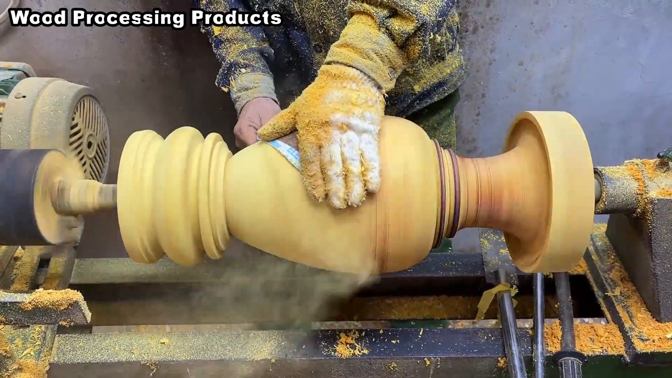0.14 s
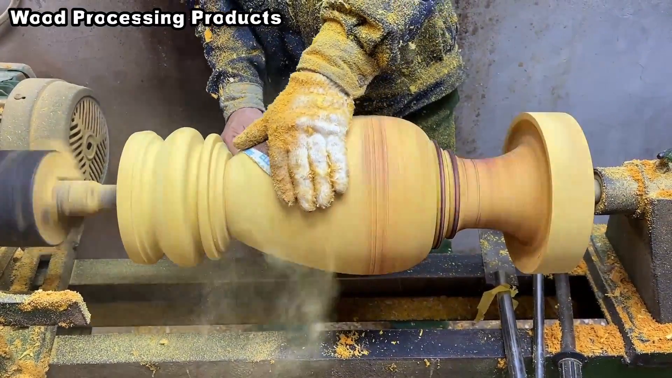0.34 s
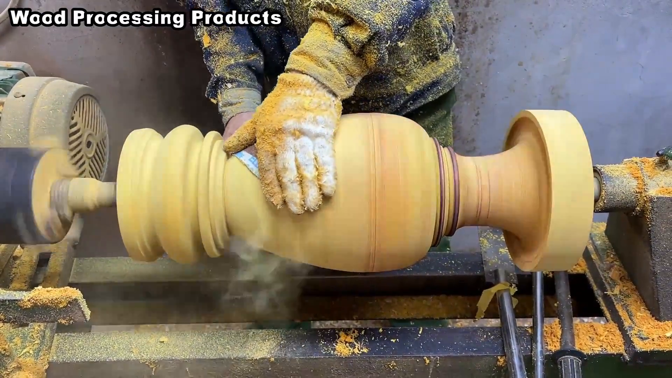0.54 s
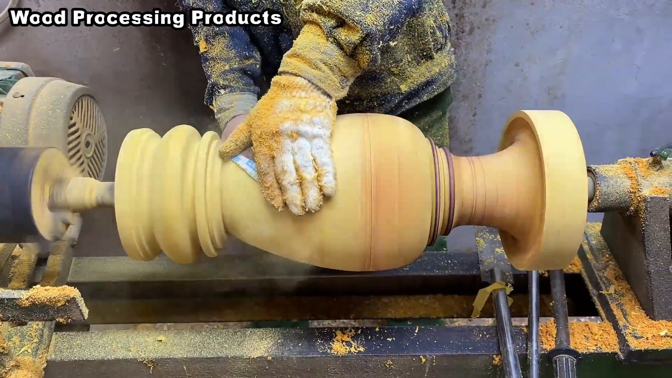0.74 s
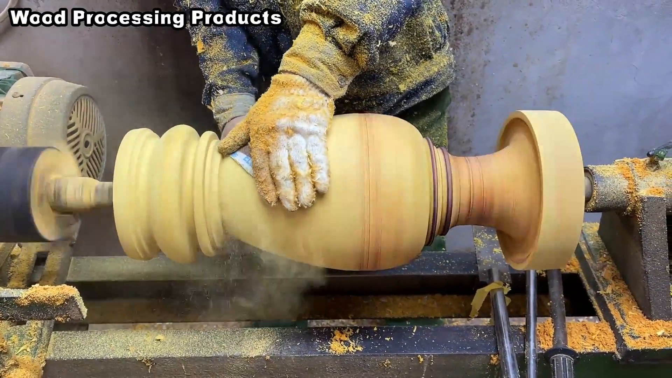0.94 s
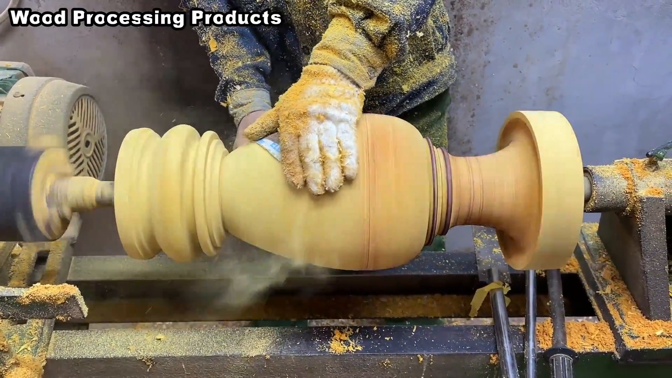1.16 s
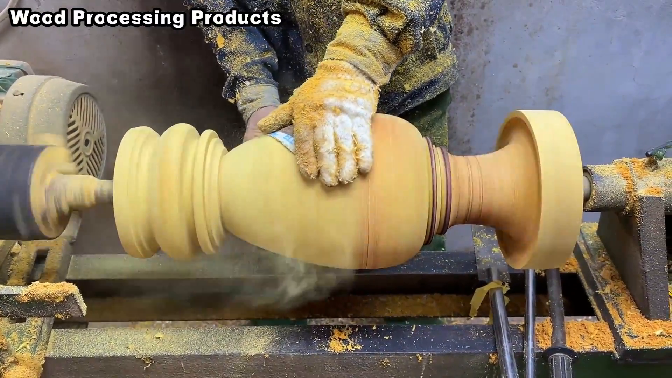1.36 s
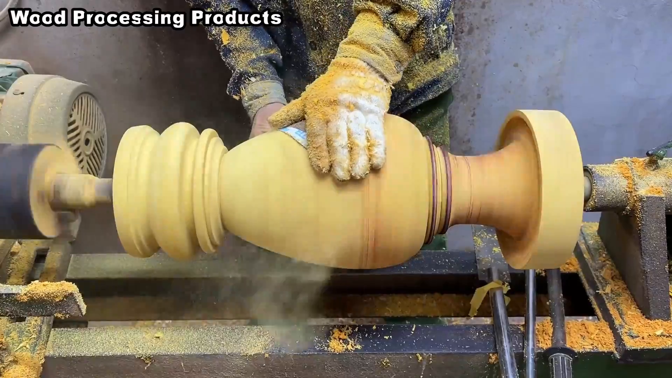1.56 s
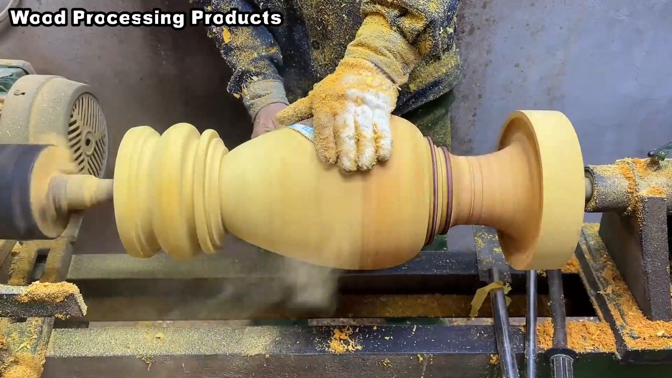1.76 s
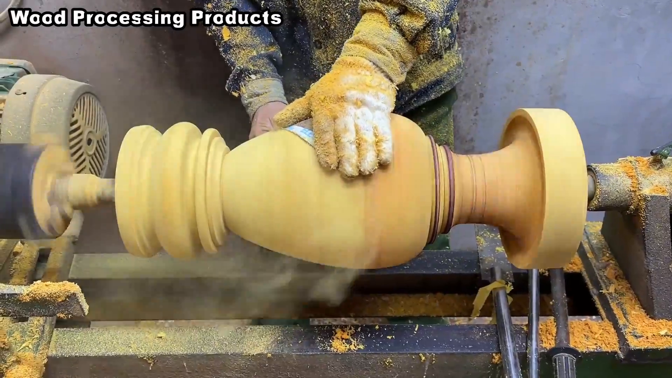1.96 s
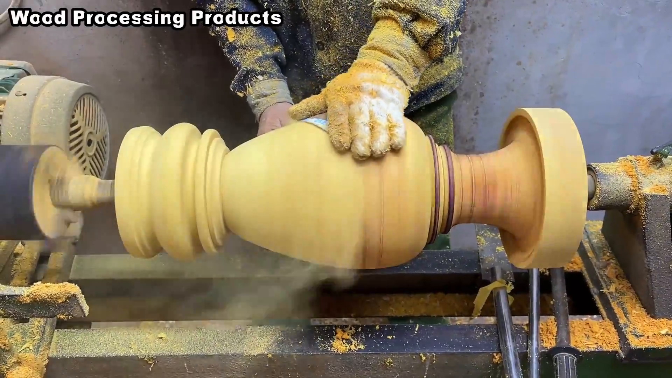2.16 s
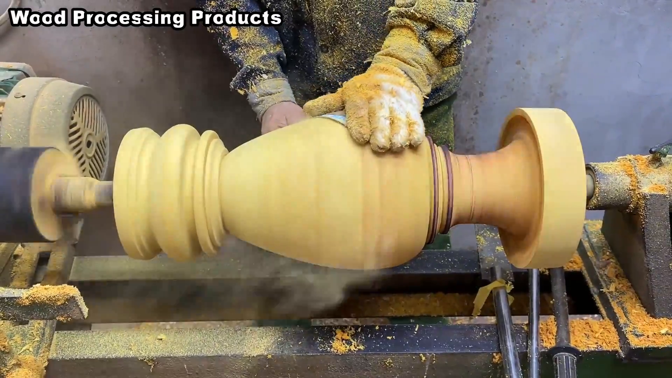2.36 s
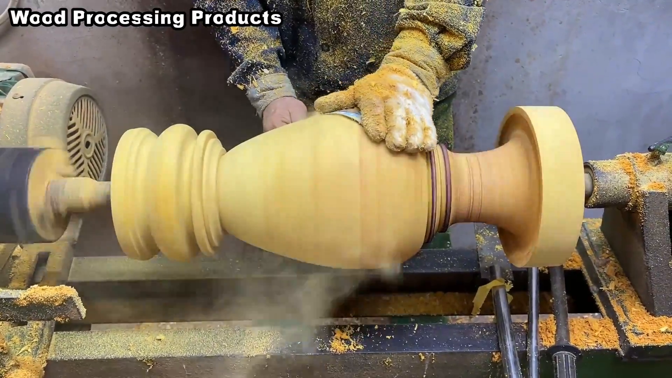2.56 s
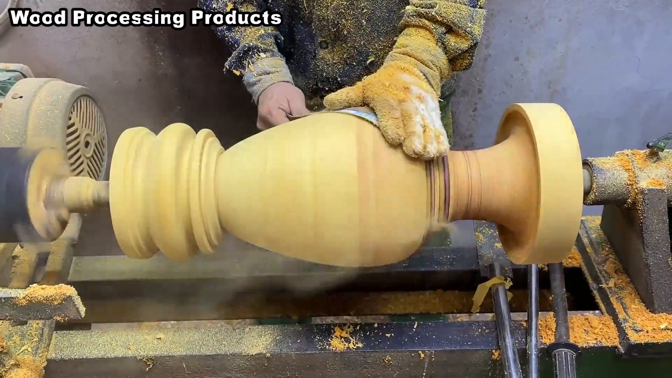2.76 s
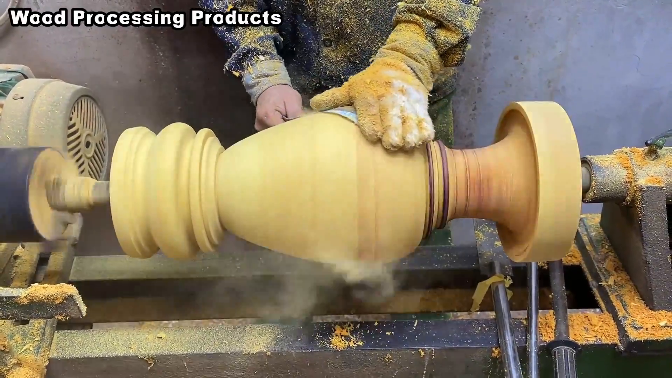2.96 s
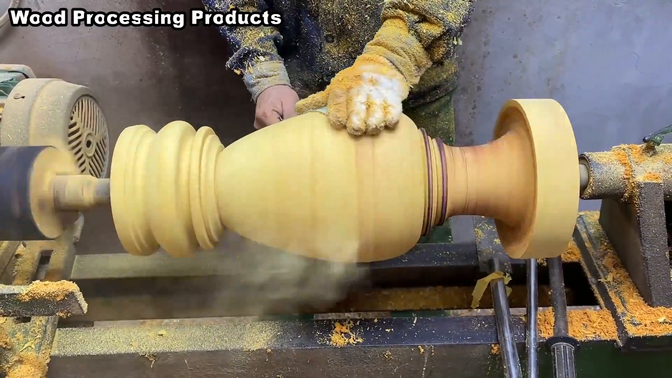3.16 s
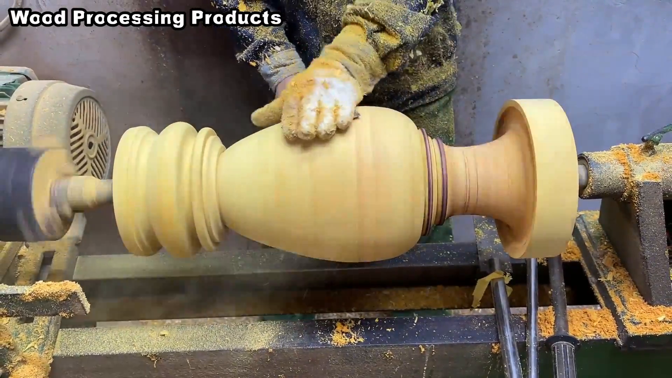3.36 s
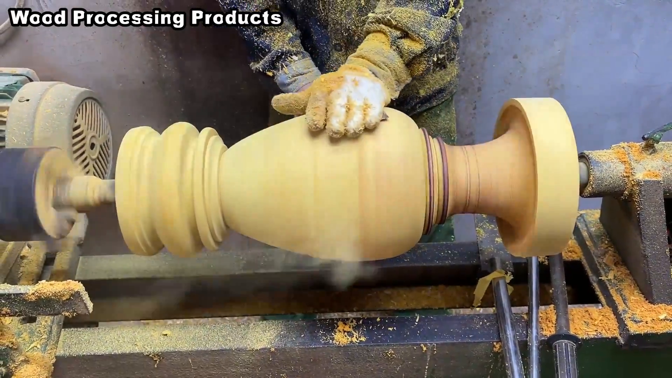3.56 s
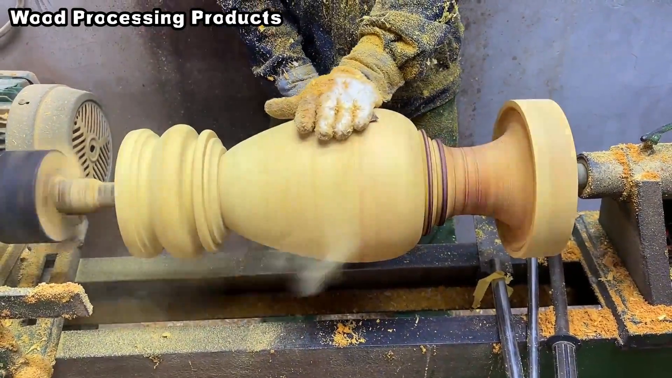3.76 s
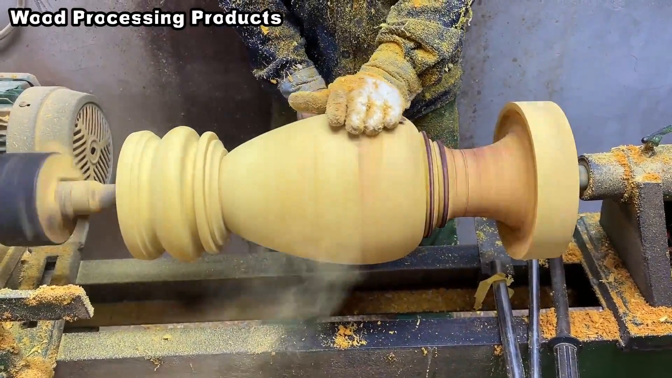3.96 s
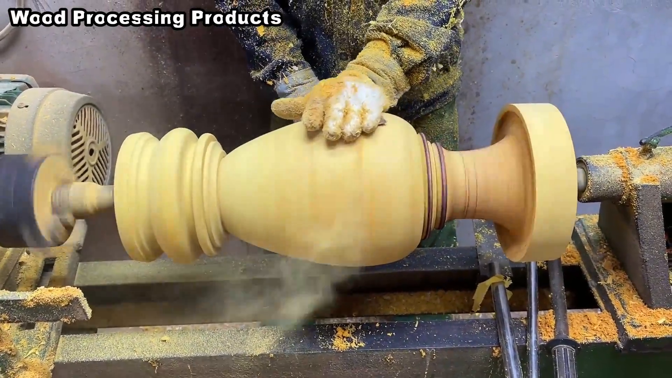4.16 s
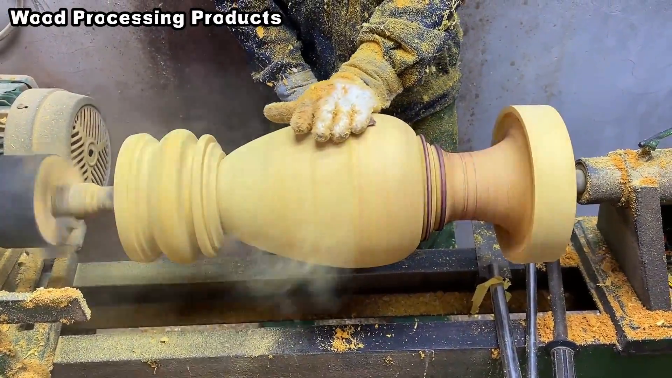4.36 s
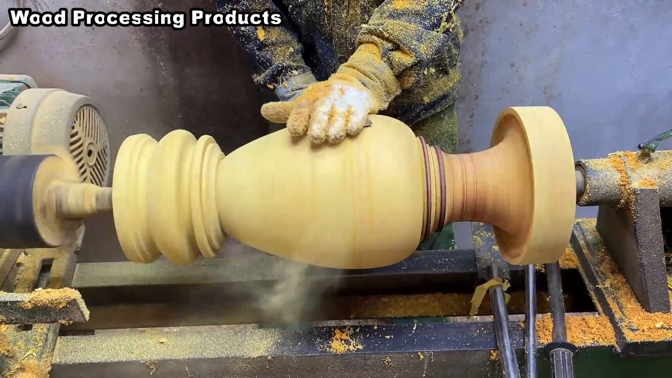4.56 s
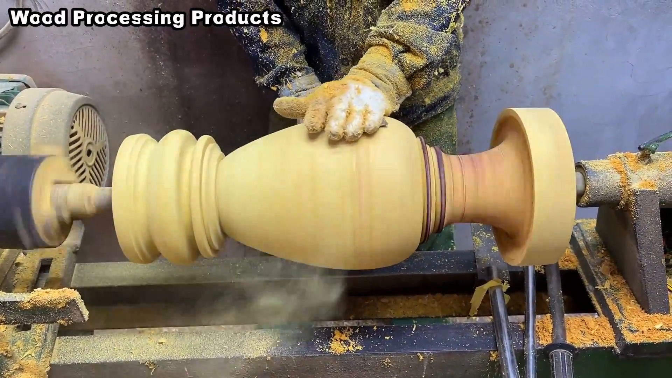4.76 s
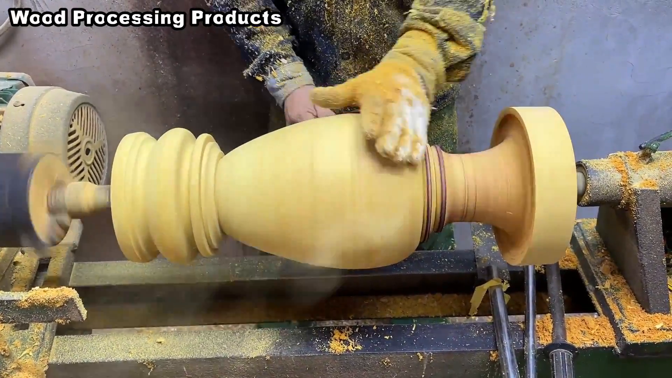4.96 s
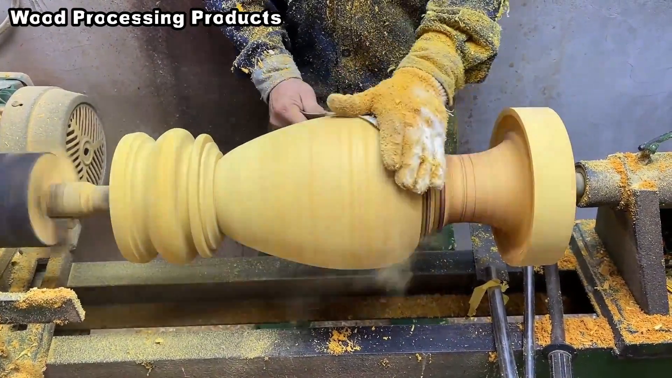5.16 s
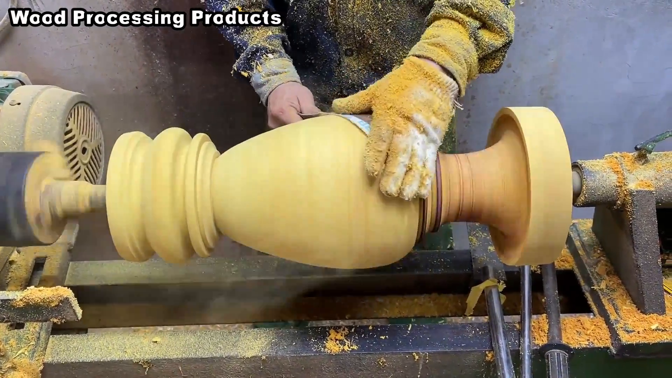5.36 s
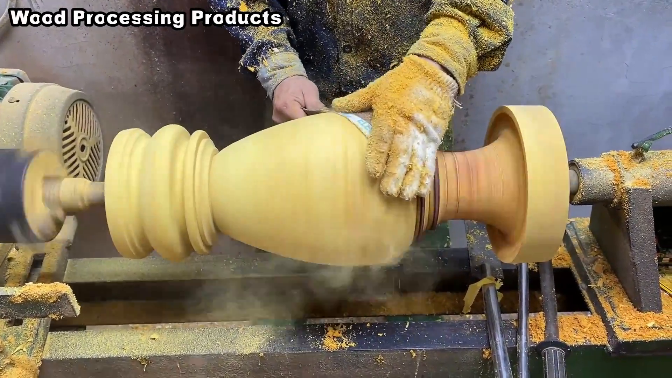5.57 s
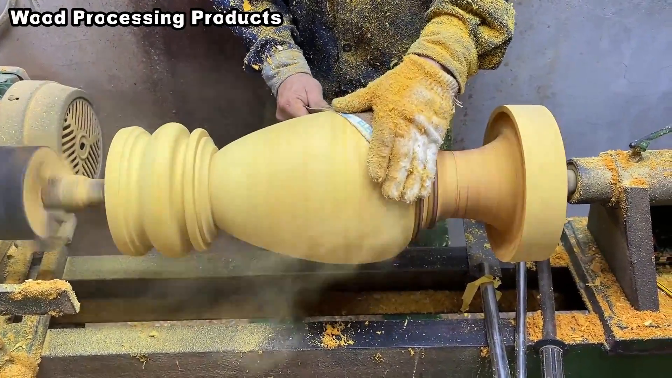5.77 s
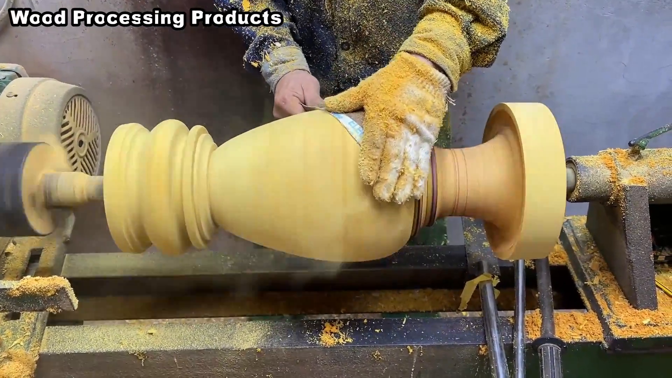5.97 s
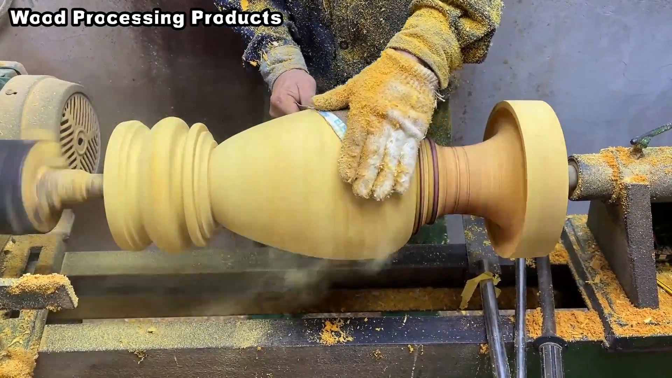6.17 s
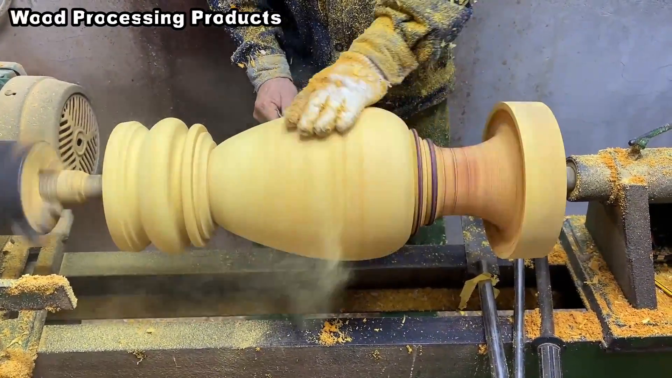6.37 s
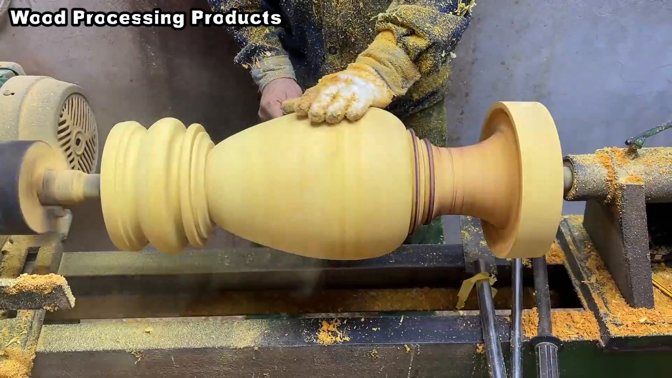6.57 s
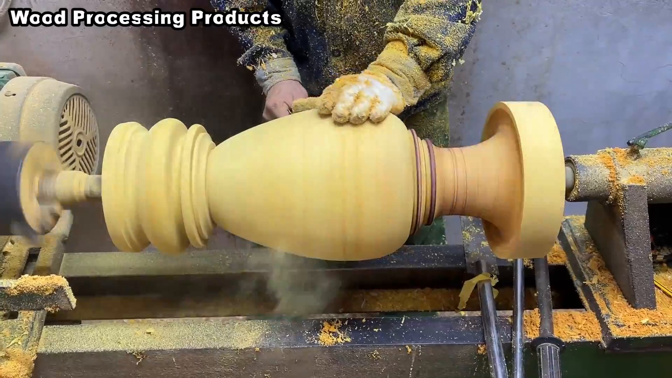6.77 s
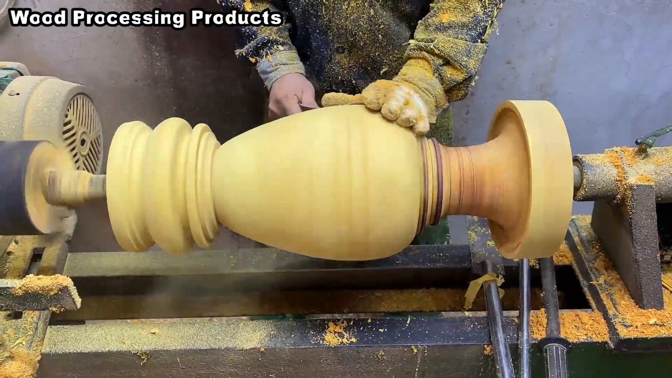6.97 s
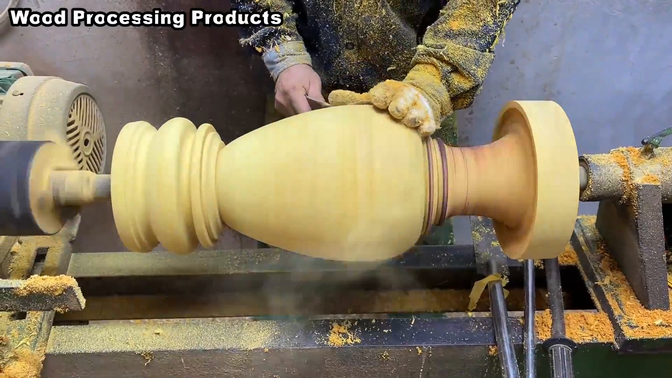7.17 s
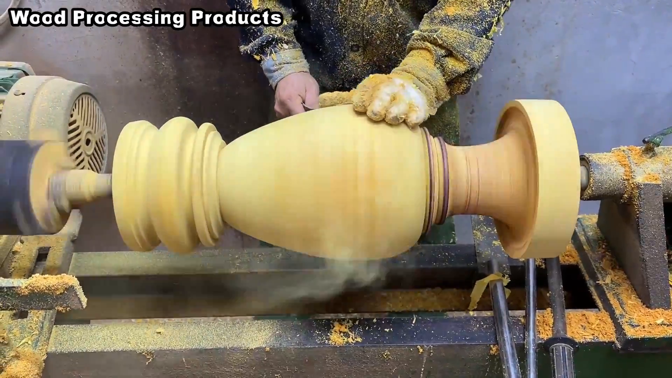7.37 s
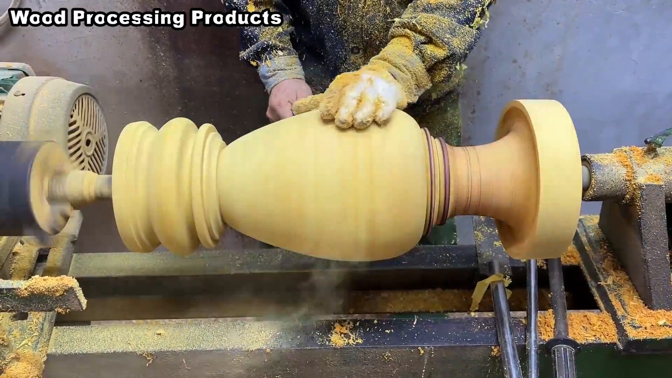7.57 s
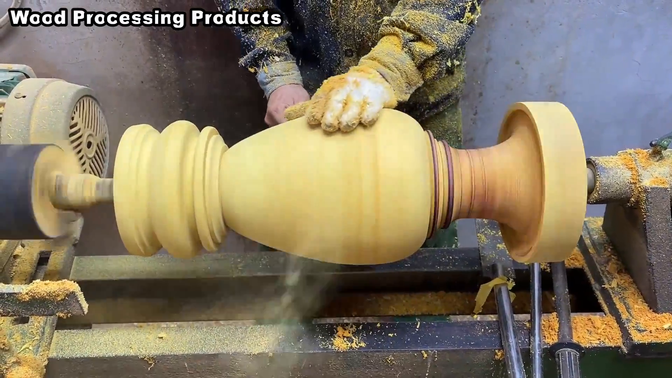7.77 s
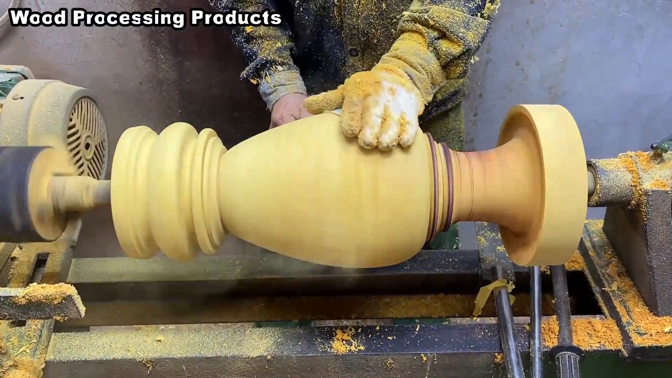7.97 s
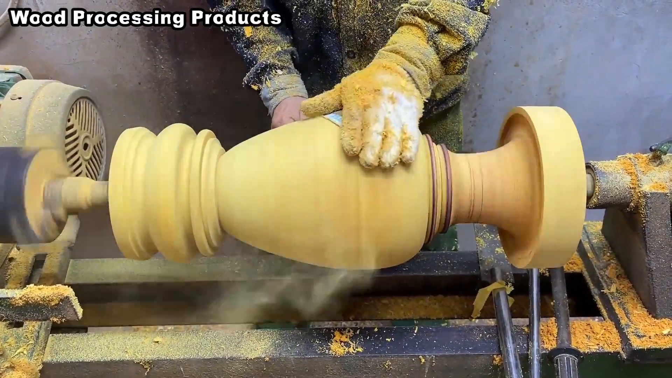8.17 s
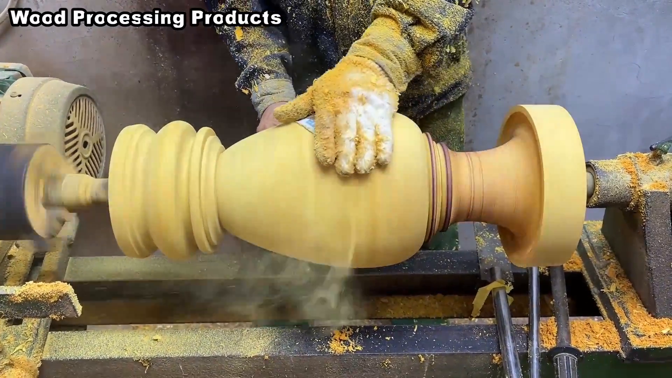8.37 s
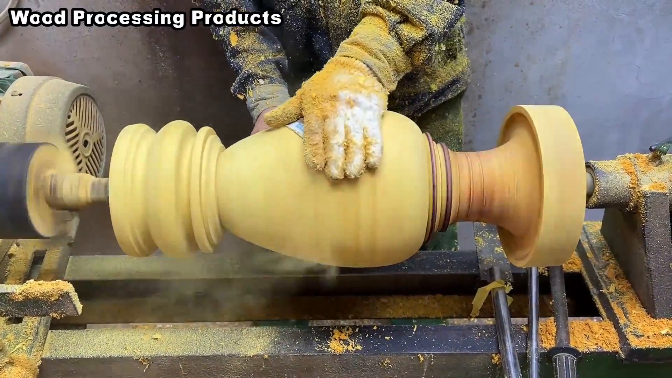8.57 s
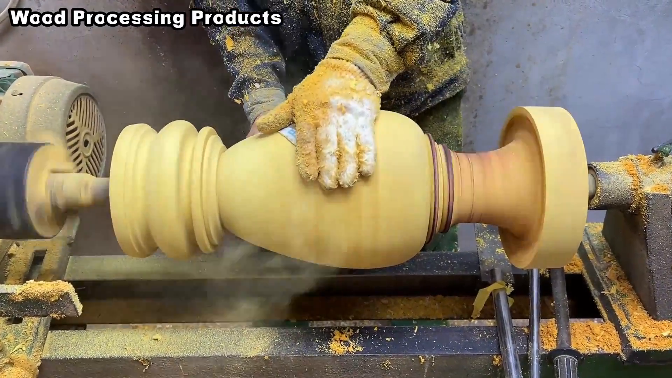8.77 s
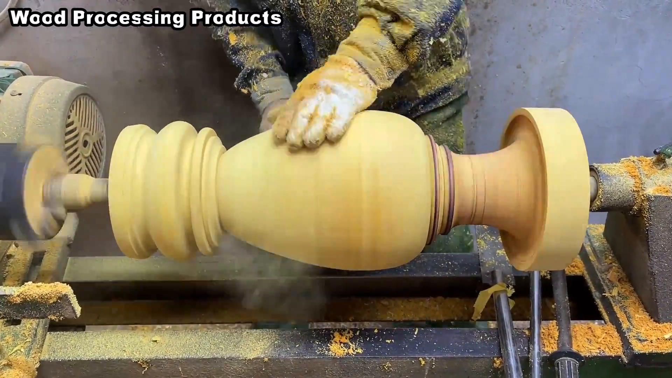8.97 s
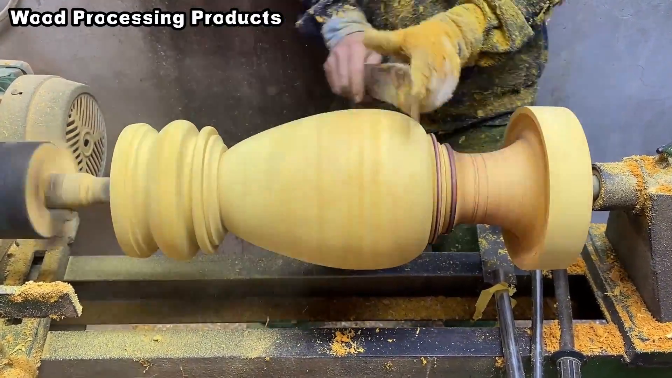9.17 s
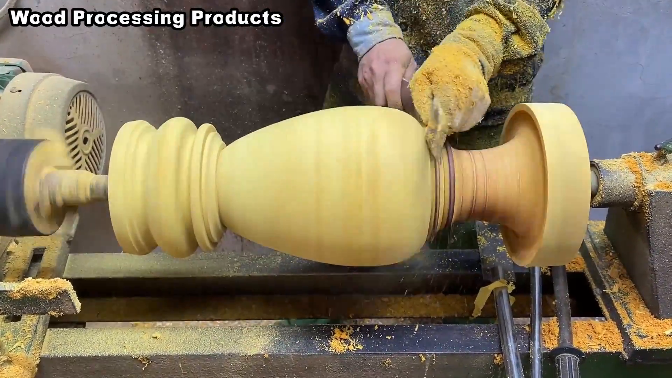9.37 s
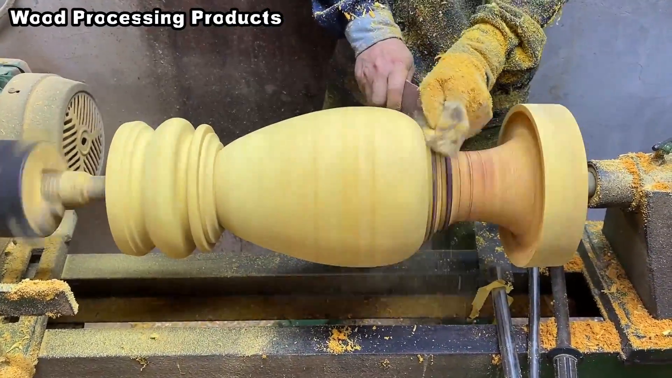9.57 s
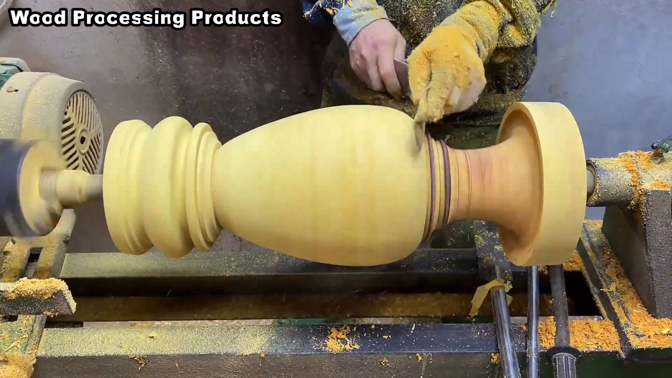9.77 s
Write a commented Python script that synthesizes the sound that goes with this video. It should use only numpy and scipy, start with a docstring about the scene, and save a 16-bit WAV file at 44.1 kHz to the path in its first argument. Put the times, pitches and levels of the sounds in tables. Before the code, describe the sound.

Close stereo sound of wood being sanded on a running lathe. A fine, gritty hiss dominates, wavering in strength and shifting between raspy and airy, weaker through the middle. A muffled mid-low motor drone flutters beneath, with a faint low hum. Irregular low wind thumps touch the microphones. The paper lifts for an instant early on, then for longer near the end, exposing the motor before a light tick and renewed sanding.

```python
"""In a workshop, a gloved hand holds sandpaper on a wooden vase spinning in a lathe.
The hiss is dense grit noise, recoloured as hand and paper travel; it stops when the paper is lifted.
The drive rumbles and throbs as noise rung through housing modes, over a broad wash and a blade tone.
The draught of the spinning work buffets the microphones: lumpy low noise with single pressure dips.
Late on, the paper's edge ticks faintly as it meets the wood again."""
import sys
import numpy as np
from scipy import signal
from scipy.fft import rfft, irfft, next_fast_len
from scipy.io import wavfile

SR = 44100
rng = np.random.default_rng(int(sys.argv[2]) if len(sys.argv) > 2 else 0)


def transcribe(signal):
    """Save signal, clipped to [-1, 1], as a 16-bit WAV file at the path in sys.argv[1]."""
    frames = np.atleast_2d(signal).T
    limited = np.clip(frames, -1, 1)
    pcm = np.round(limited * 32767).astype(np.int16)
    wavfile.write(sys.argv[1], SR, pcm)


def to_linear_factor(level_db):
    """Convert decibel levels (scalar or array-like) to linear amplitude factors."""
    exponent = np.asarray(level_db, float) / 20
    return 10 ** exponent


N = 433062
TIME = np.arange(N) / SR   # s
SIDES = np.array([[.5], [-.5]])   # splits a left-minus-right dB between left and right
SPINDLE_PER_S = 23.78   # turns of the work per second


def rms_one(x):
    """Scale to unit power."""
    return x / np.sqrt(np.mean(x ** 2) + 1e-20)


def in_time(rows):
    """Read every column of a curve table, after its time column, at every sample."""
    time_s, *columns = np.transpose(rows)
    return [np.interp(TIME, time_s, column) for column in columns]


def at_hz(points, hz):
    """Read a spectrum on a log-frequency axis."""
    points_hz, points_db = np.transpose(points)
    return np.interp(np.log(hz), np.log(points_hz), points_db)


def drift(corner_hz, count=1):
    """Slow random curves of spread 1: white noise through two equal low-pass poles."""
    hop = 40   # samples between the points of the slow curve
    pole = np.exp(-2 * np.pi * corner_hz * hop / SR)
    white = rng.standard_normal((count, N // hop + 2002))
    slow = signal.lfilter([1], [1, -2 * pole, pole ** 2], white)[:, 2000:]   # skip the filter's start
    return np.array([np.interp(np.arange(N) / hop, np.arange(len(v)), rms_one(v)) for v in slow])


def coloured(white, spectrum):
    """Shape white noise with a fixed spectrum."""
    size = next_fast_len(N)
    hz = np.maximum(np.arange(size // 2 + 1) * SR / size, 1)
    return irfft(rfft(white, size) * to_linear_factor(at_hz(spectrum, hz)), size)[..., :N]


def resonance(x, hz, width_hz):
    """Two-pole resonance with gain 1 on top."""
    r = np.exp(-np.pi * width_hz / SR)
    top = np.array([1, 0, -1]) * (1 - r * r) / 2
    return signal.lfilter(top, [1, -2 * r * np.cos(2 * np.pi * hz / SR), r * r], x)


def lifted():
    """Loss in dB while the paper is off: a steady fade, then a return in two steps."""
    # the paper is lifted clear, grazes the wood with its edge, then is pressed home:
    # leaves_s, grazes_s, pressed_s, fade_db_per_s, loss_at_graze_db
    lift_times = [(3.56, 3.658, 3.70, 152, 8.5), (9.284, 9.518, 9.592, 273, 16.5)]
    settle_s = .016   # length of each step of the return
    clear_db = 36   # loss when fully clear
    growth_db = 3   # the hiss grows while grazing
    loss_db = 0
    for off_s, graze_s, pressed_s, fade, graze_db in lift_times:
        leaving = np.clip(fade * (TIME - off_s), 0, clear_db)
        deepest = min(fade * (graze_s - off_s), clear_db)
        steps_s = [graze_s, graze_s + settle_s, pressed_s, pressed_s + settle_s]
        returning = np.interp(TIME, steps_s, [deepest, graze_db, graze_db - growth_db, 0])
        loss_db = loss_db + np.minimum(leaving, returning)
    return loss_db


def cupped(hiss, hollows, cup, reach):
    """Hollows under palm and paper resonate as the hand moves; the flexing paper adds narrow patches."""
    flex_hz = np.geomspace(2700, 9500, 14)   # small resonances of the flexing paper
    wander_db = 0.98 * drift(2.26, count=len(hollows))   # the hollows also come and go by chance
    flexing_db = 2.5 * drift(8.1, count=len(flex_hz))
    out = hiss
    for (hz, width_hz, rest_db, cup_db, reach_db), chance_db in zip(hollows, wander_db):
        lift_db = rest_db + cup_db * cup + reach_db * reach + chance_db
        out = out + (to_linear_factor(lift_db) - 1) * resonance(hiss, hz, width_hz)
    for hz, lift_db in zip(flex_hz, flexing_db):
        out = out + (to_linear_factor(lift_db) - 1) * resonance(hiss, hz, 200)
    return out


def sandpaper():
    """Dense grit scratches in third-octave bands weighted by hand and paper; each ear has its own grains."""
    # the hand: time_s, pressure_db (relative hiss level), near (paper on the near side, 0-1),
    # cup (palm cupped, 0-1), reach (towards the headstock, 0-1)
    hand_path = [(0.0, -28.5, 0.8, 0.1, 1), (0.33, -25, 0.95, 0.45, 0.8), (0.84, -28, 0.66, 0.07, 1),
                 (1.4, -27.5, 1, 0.24, 0.95), (2.0, -27.5, 1, 0.36, 0.86), (2.5, -27.5, 0.9, 0.5, 0.8),
                 (2.8, -27, 0.8, 0.75, .6), (3.2, -25.5, 0.6, 0.73, .6), (3.5, -29.5, .8, 0.86, 1),
                 (3.85, -30, 0.1, 0.07, 0.2), (4.15, -31, .3, 0.3, .5), (4.95, -32.5, 0.55, 0.36, 0.4),
                 (5.25, -31, 0.3, .4, 0.7), (5.34, -29.5, 0.7, 0.6, .6), (5.4, -27, 0.8, 0.9, .6),
                 (5.47, -26.5, .9, .7, .6), (5.53, -28.5, 0.65, 0.67, 0.8), (5.88, -28.5, 1, 1, .6),
                 (5.97, -29, 1, 0.66, 0.5), (6.62, -31.5, 1, 0.62, .5), (6.74, -32.5, 0.5, .4, .6),
                 (6.87, -33.5, .4, 0.5, .7), (7.03, -31.5, 0.3, 0.5, .3), (7.16, -34, 0.2, 0.64, 0.3),
                 (7.27, -29.5, 0.4, 0.96, 0.4), (7.36, -27.5, .4, .8, .2), (7.48, -28.5, .1, .8, .2),
                 (7.56, -27.5, 0.3, 0.96, .2), (7.68, -29, 0.5, 1, .2), (7.79, -32, 0.5, 0.64, .1),
                 (7.9, -29.5, 0.2, 0.05, .1), (8.31, -28.5, 0.2, 0.05, 0), (8.55, -27, 0.85, 0.2, .5),
                 (9.2, -28.5, 0.56, 0.26, 0.7), (9.65, -30.5, 0.85, 0.4, 0.3), (9.82, -29, 0.6, 0.5, 0.3)]
    # anchors of the colour weights: rasp, the steady middle between the next two, finest grit [Hz]
    colour_hz = [2000, 3600, 9560, 12200]
    # grit spectrum: pitch_hz, relative_density_db
    hiss_spectrum = [(700, -35), (1100, -7), (1400, -10), (2600, -6), (2950, -4), (4000, -2.5),
                     (5800, -3.5), (8600, -3), (9600, -6.5), (10300, -5.5), (11800, -16), (12600, -25.5),
                     (15700, -31.5), (17000, -32)]
    # stereo tilt of the grit: pitch_hz, left_minus_right_db
    hiss_balance = [(1500, 0), (2500, -0.5), (5500, 0), (8000, -3), (9500, 2), (12300, 2), (13300, -28.5)]
    # swell once and twice a turn, off-centre work and end grain passing [dB]
    grain_turn_db = [.22, .2]
    # hollows under the gloved palm and the paper strip, a set for each ear:
    # pitch_hz, width_hz, rest_db, added_by_cupping_db, added_by_reach_db
    hollows_left = [(4000, 620, 2.5, -2, -2.5), (5200, 630, -7.5, 0.5, 13.5), (6860, 660, 1.5, 5.5, 0.5),
                    (7880, 610, 1.5, 1.2, 2.5)]
    hollows_right = [(4130, 590, 2.5, 1, -1.6), (5060, 620, -1.1, 0.8, 2), (6400, 1100, -2.5, 10, 0.9),
                     (7100, 1500, -1.0, 4.5, -2), (8900, 780, -2, 4.5, 3)]

    pressure_db, near, cup, reach = in_time(hand_path)
    loss_db = lifted()
    hiss_db = pressure_db - loss_db
    rasp_db = (0.86 - 1) * hiss_db   # the rasp takes 0.86 of the pressure swing
    # the work shades the finest grit when the paper is over the top; a lift costs it a little more
    finest_db = -9 * (1 - near) - .15 * loss_db
    pan_db = -2 + 1.5 * cup   # a cupped palm turns the hiss leftwards
    steady_db = np.zeros(N)
    colours = np.array([c - np.median(c) for c in (rasp_db, steady_db, steady_db, finest_db)])

    # grain sizes are uneven, so the hiss is a little spikier than plain noise
    sizes = to_linear_factor(2.5 * np.minimum(rng.exponential(1, (2, 2, N)), 5))
    scratches = sizes * (rng.random((2, 2, N)) < .3)   # share of samples that hold a scratch
    grains = coloured(scratches * rng.choice([-1, 1], (2, 2, N)), hiss_spectrum)
    grains = grains / grains.std()

    edges_hz = 900 * 2 ** np.arange(0, 4.4, 1 / 3)
    out = 0
    for k, (low, high) in enumerate(zip(edges_hz, edges_hz[1:])):
        hz = np.sqrt(low * high)
        place = np.interp(np.log(hz), np.log(colour_hz), np.arange(len(colour_hz)))
        below = min(int(place), len(colour_hz) - 2)
        colour_db = colours[below] + (place - below) * (colours[below + 1] - colours[below])
        patchy_db = 0.5 * drift(5.4, count=2)
        band_filter = signal.butter(2, [low, high], "band", fs=SR, output="sos")
        band = signal.sosfilt(band_filter, grains[k % 2])   # neighbouring bands use separate grains
        out = out + band * to_linear_factor(colour_db + patchy_db + SIDES * at_hz(hiss_balance, hz))

    left = cupped(out[0], hollows_left, cup, reach)
    right = cupped(out[1], hollows_right, cup, reach)
    turn = 2 * np.pi * SPINDLE_PER_S * TIME
    turn_db = sum(db * np.cos((k + 1) * turn) for k, db in enumerate(grain_turn_db))
    unsteady_db = 0.5 * drift(30)
    return np.array([left, right]) * to_linear_factor(2 + hiss_db + SIDES * pan_db + turn_db + unsteady_db)


def drive():
    """Bearing noise rings the housing and throbs; a broad wash and the fan's blade tone lie under it."""
    # rumble: time_s, relative_level_db
    rumble_curve = [(0.0, -36), (2.6, -37), (2.9, -38.5), (6.4, -38.5), (6.8, -37.5), (9.2, -38),
                    (9.82, -36)]
    # housing modes: pitch_hz, width_hz (of each of two passes), relative_level_db,
    # left_minus_right_db, share of the throb
    housing_modes = [(450, 207, -7.5, -2.5, 0.23), (646, 140, -4, -0.5, 0.69), (742.7, 100, 1.5, 2.5, 1.07),
                     (780, 188, -8, 2.5, 1.27), (1096, 410, -15.5, 3, 0.37)]
    # wash spectrum: pitch_hz, relative_density_db
    wash_spectrum = [(100, -31.5), (250, -15), (1000, -18), (1700, -22), (2400, -29.5), (3100, -33.5),
                     (6000, -43), (9500, -49), (11500, -75)]
    # belt and bearings pass again and again: rate_per_s, first_crest_s, depth_db (times a mode's share)
    throb_cycles = [(6.11, .114, 1.2), (8.38, .030, .6), (11.35, .070, 1.2), (14.5, .028, 1.6),
                    (20.59, .002, .8), (29.9, .024, .6)]
    # blade tone: time_s, level_db (rms, before its waver)
    blade_curve = [(0, -60), (2.7, -56), (4.5, -59), (5.15, -52), (5.3, -80), (5.85, -65), (6.0, -55),
                   (9.82, -53)]
    fan_blades, fan_lead_rad = 5, 0.36   # the left ear leads the right

    rumble_db, = in_time(rumble_curve)
    throb_db = 2 * drift(32)
    for per_s, crest_s, depth_db in throb_cycles:
        throb_db = throb_db + depth_db * np.cos(2 * np.pi * per_s * (TIME - crest_s))
    rings = 0
    for hz, width_hz, level_db, pan_db, share in housing_modes:
        rolling = rng.standard_normal((2, N))
        ring = resonance(resonance(rolling, hz, width_hz), hz, width_hz)
        rings = rings + ring * to_linear_factor(level_db + SIDES * pan_db + share * throb_db)
    rumble = rms_one(rings) * to_linear_factor(4 + rumble_db)

    wash = coloured(rng.standard_normal((2, N)), wash_spectrum) * to_linear_factor(28 + rumble_db)

    blade_db, = in_time(blade_curve)
    blade_phase = 2 * np.pi * fan_blades * SPINDLE_PER_S * TIME + SIDES * fan_lead_rad
    blade_tone = np.sqrt(2) * to_linear_factor(blade_db + 2 * drift(4.2)) * np.cos(blade_phase)
    return rumble + wash + blade_tone


def draught():
    """Lumpy low noise on the microphone ports, mostly their own; strongest buffets are pressure dips."""
    # strength of the moving air: time_s, relative_level_db
    air_curve = [(0.0, -47), (0.4, -43.5), (1.0, -42.5), (1.45, -46), (1.85, -45), (2.05, -45),
                 (2.3, -41.5), (2.9, -49), (3.05, -44.5), (3.7, -53.5), (3.83, -45), (4.0, -53), (5.3, -51),
                 (5.7, -53), (5.82, -63), (5.92, -52), (6.28, -49), (6.85, -46), (7.25, -56), (7.43, -46),
                 (7.58, -52), (8.55, -50), (8.7, -45.5), (9.0, -52), (9.45, -48), (9.82, -48)]
    # air spectrum: pitch_hz, relative_density_db
    air_spectrum = [(20, -2), (60, -4), (115, 5.5), (180, 0.5), (300, -10), (500, -49)]
    # single buffets: centre_s, peak_db, left_minus_right_db, length_ms (of the dip)
    buffet_dips = [(.296, -33, 2, 5.3), (0.385, -44, 3, 5.2), (.926, -39, -10, 6.6), (2.686, -30, -6, 6.7),
                   (4.572, -39, 6, 9), (4.756, -30, -3, 8.9), (4.908, -29, 4, 5.5), (5.505, -29, -8, 2.4),
                   (5.659, -29, -6, 2), (6.356, -35, -12, 6.5), (6.681, -27, 5, 3.3), (6.785, -42, 1, 8),
                   (7.857, -31, 4, 4.8), (9.556, -31, 2, 5.3)]
    gust_db, gust_s = 4.5, 0.052   # the air swells around every buffet
    shared = 0.046   # share of air power common to both ports

    level_db, = in_time(air_curve)
    for centre_s, *_ in buffet_dips:
        level_db = level_db + gust_db * np.exp(-((TIME - centre_s) / gust_s) ** 2)
    both, *own = coloured(rng.standard_normal((3, N)), air_spectrum)
    air = rms_one(np.sqrt(shared) * both + np.sqrt(1 - shared) * np.array(own))
    lumps_db = 0.5 * drift(23) + 2.5 * drift(17, count=2)   # common to both ports, then each its own
    out = air * to_linear_factor(2 + level_db + lumps_db)
    for centre_s, peak_db, pan_db, length_ms in buffet_dips:
        centre = round(centre_s * SR)
        near = np.arange(centre - 2000, centre + 2000)
        u = ((near / SR - centre_s) * 2000 / length_ms) ** 2
        dip = (1 - u) * np.exp(-u / 2)   # with a rebound either side
        out[:, near] -= to_linear_factor(peak_db + SIDES * pan_db) * dip
    return out


def touch():
    """The paper's edge meets the wood again: a faint tick, milliseconds of dying scratch noise."""
    start_s, level_db, pan_db = 9.527, -47, -10   # level at the onset; left minus right
    pitch_hz, width_hz, decay_ms = 3300, 1500, 3.0
    after = TIME - start_s
    burst = (after > 0) * np.exp(-np.abs(after) * 1000 / decay_ms)
    scratch = rms_one(resonance(rng.standard_normal((2, N)), pitch_hz, width_hz))
    return to_linear_factor(level_db + SIDES * pan_db) * burst * scratch


def scene():
    """Paper, drive, draught and the tick of the paper's edge together."""
    return sandpaper() + drive() + draught() + touch()


def low_pass(x):
    """Removes everything above the highest recorded frequency."""
    return signal.sosfilt(signal.butter(12, 16020, fs=SR, output="sos"), x)


def record(dry):
    """Deliver the finished mix."""
    return low_pass(dry)


dry = scene()
out = record(dry)
transcribe(out)
```